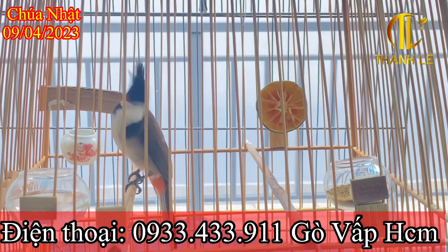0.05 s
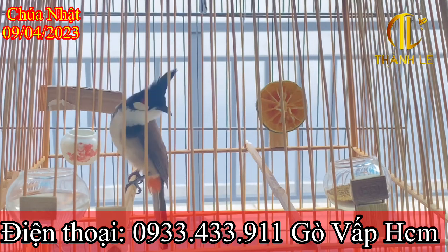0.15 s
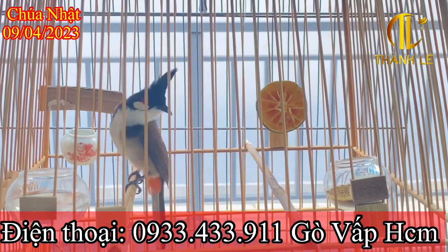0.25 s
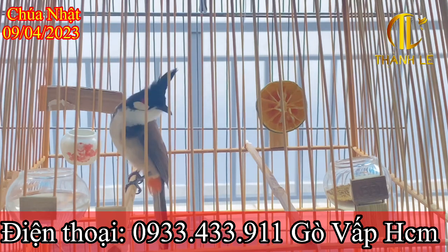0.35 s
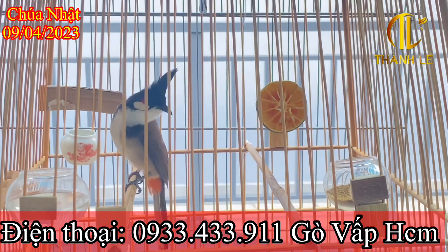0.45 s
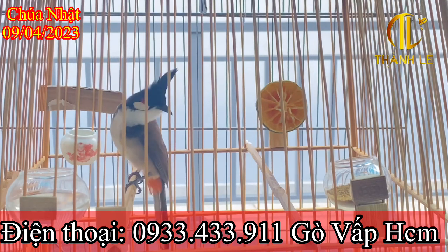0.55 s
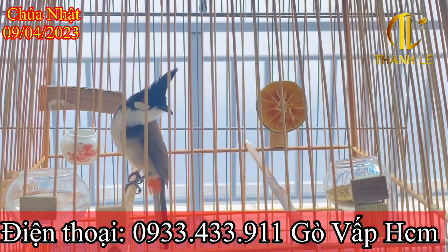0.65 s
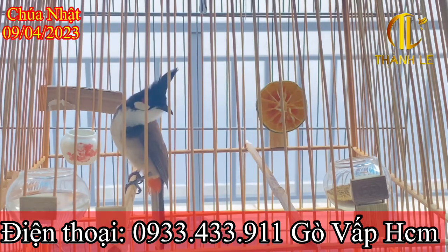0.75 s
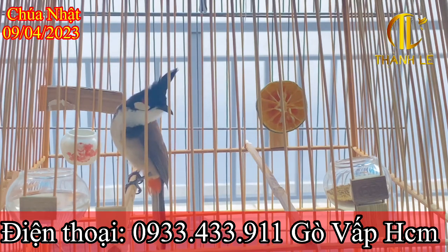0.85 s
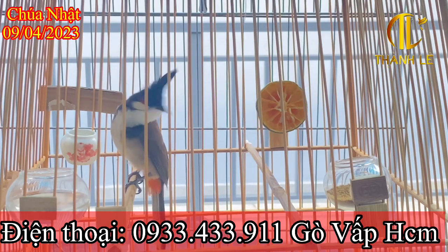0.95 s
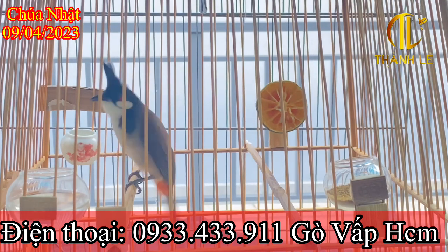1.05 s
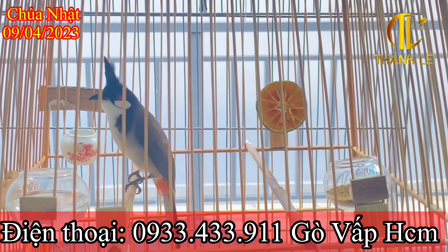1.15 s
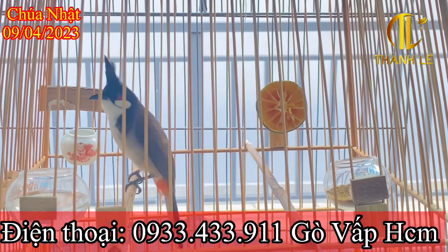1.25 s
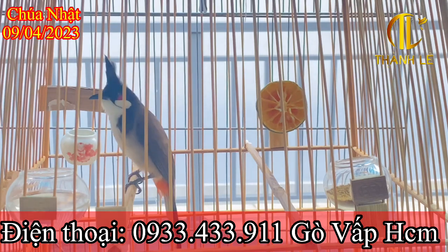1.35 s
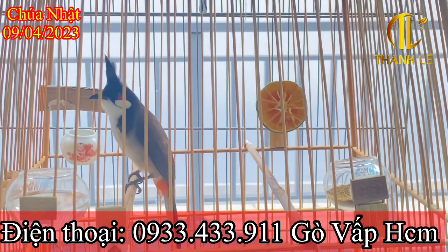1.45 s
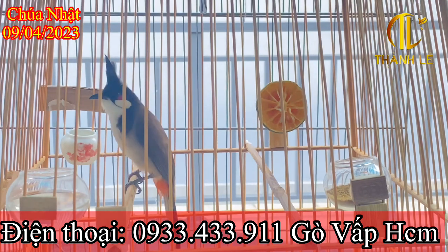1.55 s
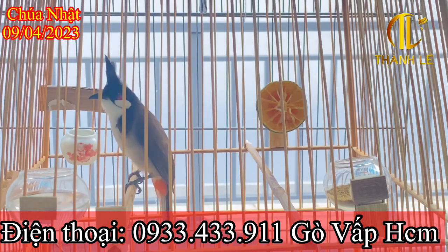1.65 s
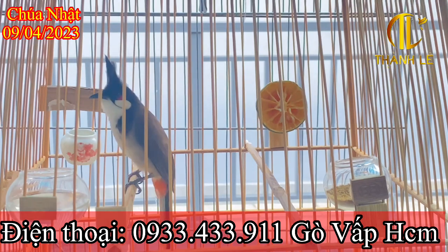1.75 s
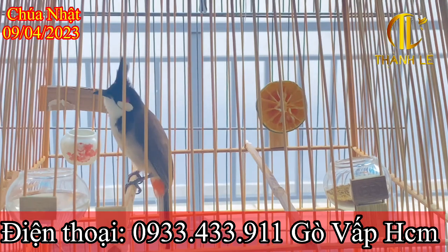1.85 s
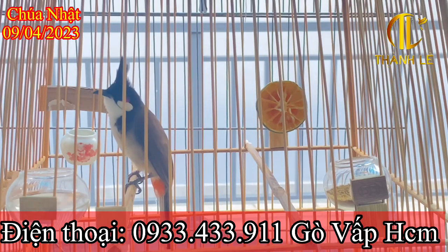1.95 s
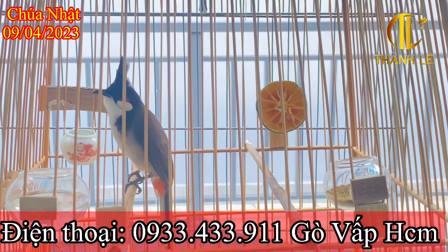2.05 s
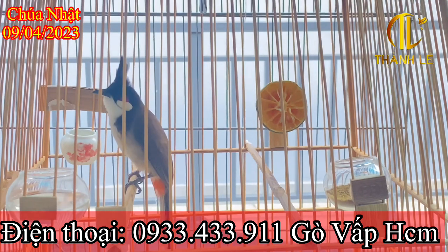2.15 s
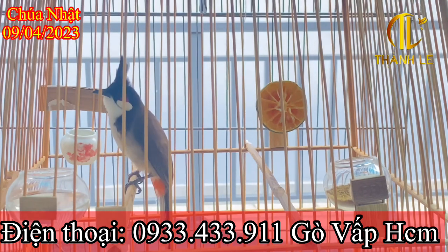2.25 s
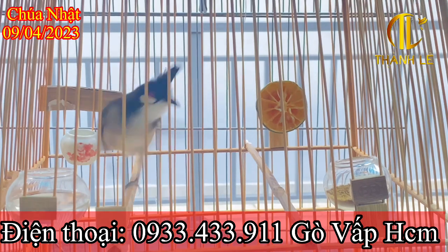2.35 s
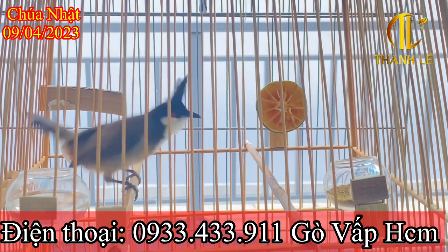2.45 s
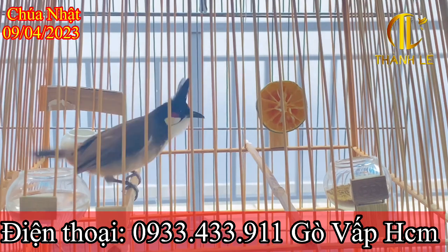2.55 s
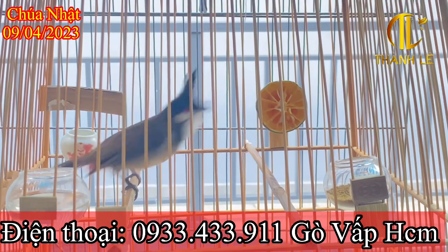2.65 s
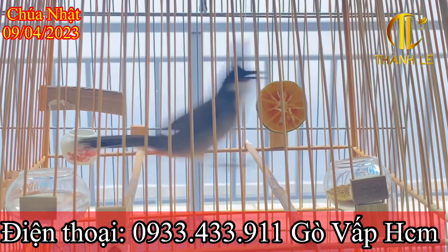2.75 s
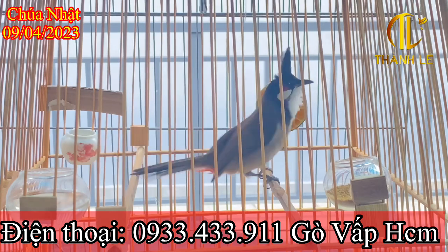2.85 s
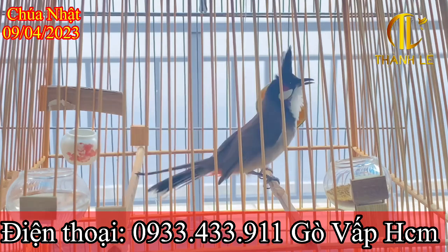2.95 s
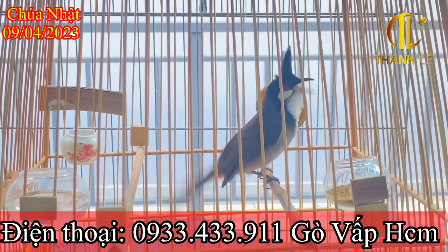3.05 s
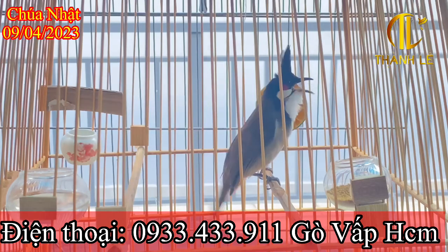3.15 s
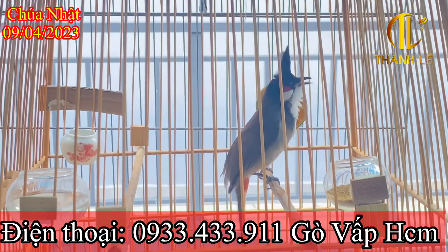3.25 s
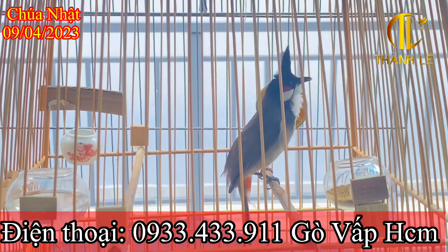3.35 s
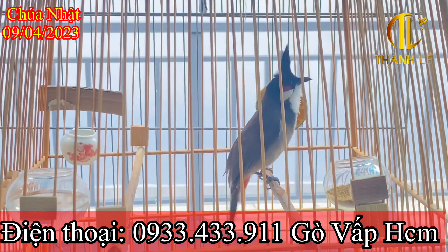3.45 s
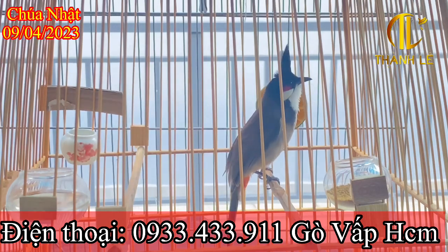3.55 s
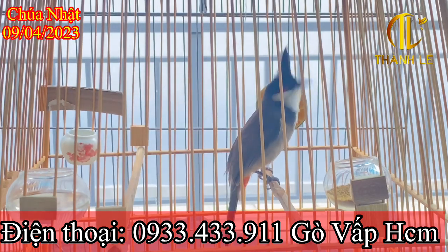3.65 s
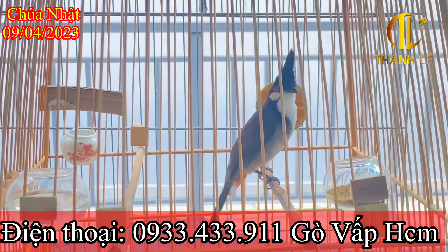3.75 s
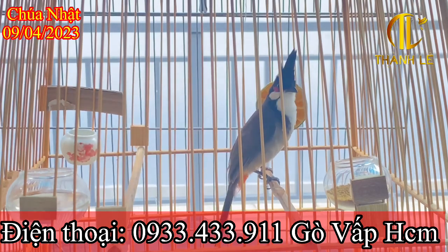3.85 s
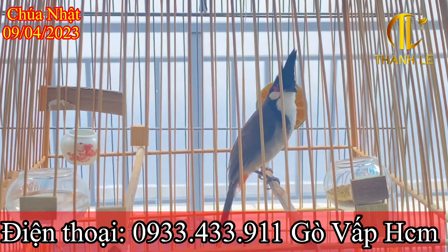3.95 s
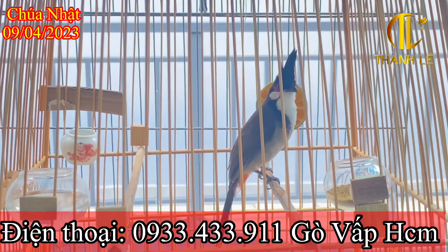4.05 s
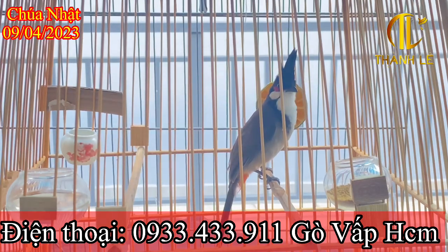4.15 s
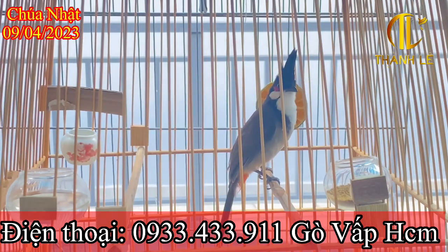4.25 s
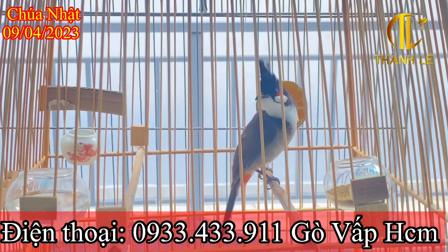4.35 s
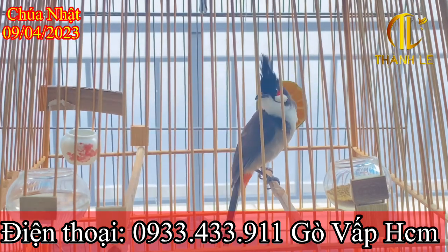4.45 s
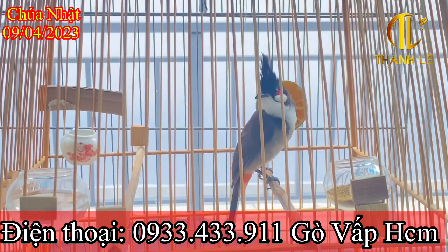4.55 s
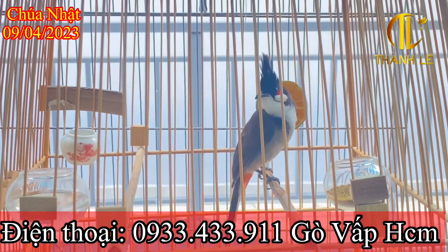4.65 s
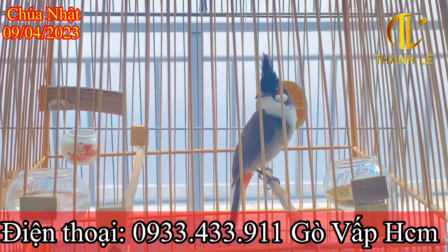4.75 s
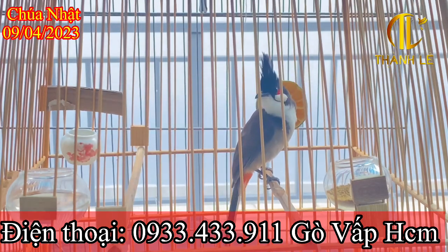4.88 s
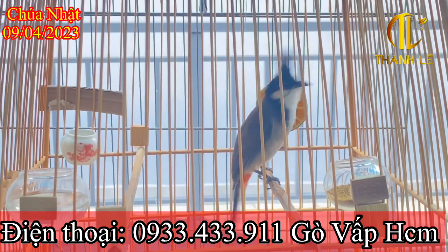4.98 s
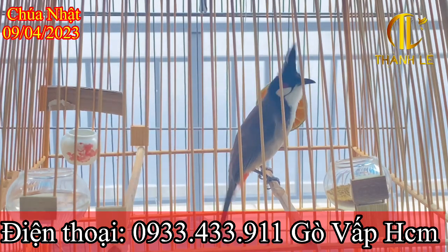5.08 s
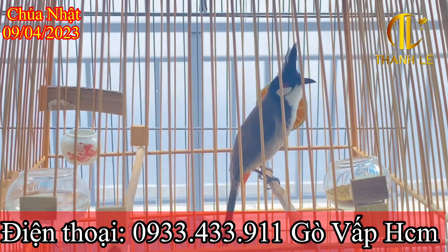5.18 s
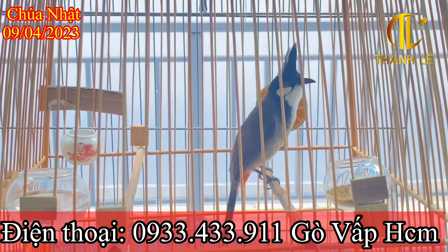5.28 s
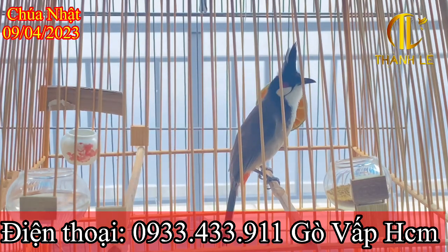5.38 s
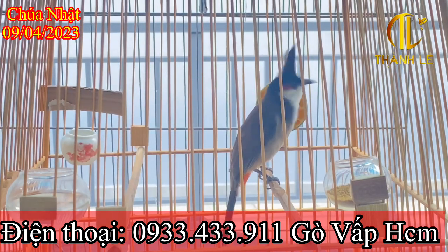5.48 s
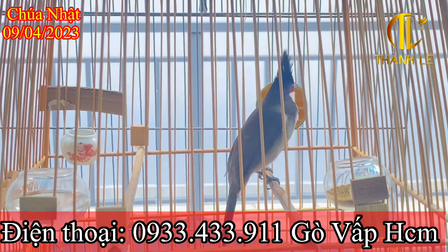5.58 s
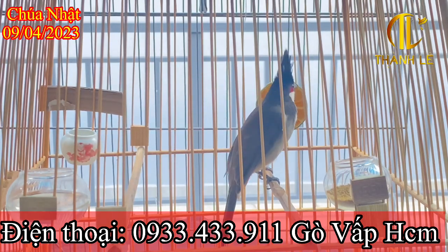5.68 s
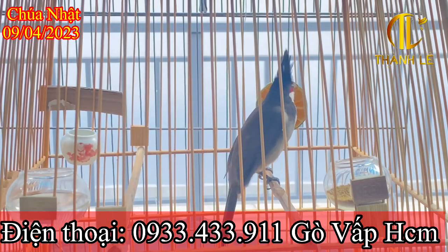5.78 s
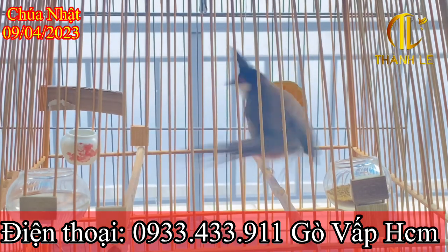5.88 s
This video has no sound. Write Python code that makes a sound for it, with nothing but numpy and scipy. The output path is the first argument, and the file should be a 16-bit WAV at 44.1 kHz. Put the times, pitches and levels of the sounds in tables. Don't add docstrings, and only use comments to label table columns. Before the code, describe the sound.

Short, loud, liquid bird phrases ring out near the microphone with hard echoes, over quiet air, perch knocks and a distant low hum.

```python
import sys
import numpy as np
from scipy import signal
from scipy.fft import rfft, irfft, next_fast_len
from scipy.io import wavfile
from scipy.ndimage import uniform_filter1d, map_coordinates

SR = 44100
rng = np.random.default_rng(int(sys.argv[2]) if len(sys.argv) > 2 else 0)


def store_wav(level_fs):
    pcm = np.round(np.clip(np.atleast_2d(level_fs), -1, 1) * 32767)
    wavfile.write(sys.argv[1], SR, pcm.T.astype(np.int16))


def nominal_scale(level):
    x = np.asarray(level, float) / 20
    return 10 ** x


N = 261072

# (peak level in dB, swing in Hz, time of one pitch dip in seconds, dips per second, rate change per second).
TRILLS = [
    ("rise", (0.4285, .064, 2250, 3430, 3400), (-16, 720, 0.466, 155, -1600)),
    ("arch", (.555, .115, 2600, 3200, 2520), (-21, 480, 0.605, 113, -1100)),
    ("swell", (2.755, .053, 2000, 2230, 2330), (-17.5, 270, 2.7865, 95, 1)),
    ("lead", (3.041, 0.035, 1750, 2350, 2350), (-18.5, 500, 3.065, 150, 1)),
    ("rise", (4.375, .069, 2400, 3260, 3180), (-16.5, 720, 4.4002, 190, -400)),
    ("arch", (4.505, 0.13, 2600, 3250, 2540), (-16, 560, 4.553, 107, -1100)),
    ("burst", (4.702, 0.0472, 2950, 3690, 3620), (-14, 870, 4.7238, 98, 100)),
    ("roll", (4.829, .097, 3050, 3250, 2750), (-16.5, 420, 4.8762, 105, -200)),
]
TRILL_SHAPES = { "rise": [(0, 0, 0, -17.5, 0.99), (.25, .45, 0.016, -9.5, 0.98),
                (.48, .9, 0.023, -2.5, .65), (.62, 0.98, 0, -1.5, .4), (.8, 1, .2, 0, .12),
                (.94, 0.99, .9, -1.5, .09), (1, 0.99, 0.98, -7.5, .07)], "swell": [(0, 0, 0, -11, .5),
                (.2, .1, 0, -9.5, .7), (.4, .85, 0, -4, 1), (.6, .9, 0, -3.5, .9), (.8, 1, 0, -0.5, .2),
                (1, 1, 0.97, -8, .1)], "roll": [(0, 0, 0, -10, 1), (.06, .2, 0, -3.5, .9),
                (.2, .6, 0.027, -.5, .9), (.4, 1, 0, -1, 0.98), (.75, 1, .7, -3, 1), (.9, 1, .95, -7, .9),
                (1, 0.87, 1, -16, .8)], "arch": [(0, 0, 0, -16, .9), (.06, .05, 0, -10.5, 1),
                (.2, .1, 0, -7.5, .9), (.3, .55, 0, -3.5, .85), (.45, 1, 0, -.5, .75),
                (.53, 1, .15, -.5, .75), (.64, 1, .65, -5, .75), (.9, 1, 0.94, -6, 0.75),
                (1, 0.98, 0.97, -20, .5)], "burst": [(0, 0, 0, -13, .9), (.15, .55, 0, -9, 0.93),
                (.35, .98, 0.031, -3, 1), (.55, 1, 0.44, 0, 0.91), (.8, 1, .9, -1.5, .85),
                (1, 0.95, 1, -20, .7)], "lead": [(0, 0.0045, 0, -14, .7), (.2, .35, 0, -4, .75),
                (.4, .35, 0, -5, .75), (.6, .75, 0, 0, .85), (.9, .9, 0, 0.5, 1), (1, 0.98, 0, -7, 1)], }
TRILL_STYLE = {"rise": (32, 30, .15, .8), "arch": (34, 16, .35, .93), "burst": (17, 30, .25, .8),
               "lead": (24, 40, .2, .8), "swell": (20, 30, .1, .8), "roll": (18, 30, .05, .8)}
# start in seconds,
# length in seconds, first and last pitch in Hz, level in dB.
WHISTLES = [(.546, 0.014, 2300, 1910, -29.5), (2.634, 0.0095, 1610, 1490, -38),
            (2.642, 0.015, 2400, 2060, -30.5), (2.714, 0.043, 1800, 1630, -30),
            (2.805, .02, 2230, 2240, -31), (2.921, 0.015, 1380, 1540, -29.5),
            (2.933, 0.031, 1928, 1975, -24), (2.960, .039, 1850, 1830, -19),
            (3.073, .011, 2954, 2850, -9.5), (3.0835, .0215, 2897, 3450, -12),
            (3.193, .031, 3060, 2845, -14.5), (3.251, 0.021, 2200, 2050, -25),
            (3.269, .028, 2403, 2350, -17), (3.293, 0.055, 2774, 2586, -16),
            (3.351, 0.03, 2071, 1911, -26.5), (3.376, .061, 2083, 1489, -20),
            (4.496, 0.0083, 2380, 1790, -29), (4.804, .026, 2200, 2440, -26)]
# time in seconds, pitch change in Hz,
# half width in seconds, level lift in dB.
BENDS = [(.558, 500, .003, 3), (.551, -100, .003, 2), (.628, 150, .004, 3), (.663, 100, .002, 3),
         (2.6515, 1, .002, 5), (2.741, 1, .012, 9.5), (2.756, 150, .003, -3), (2.7805, 1, .001, -5),
         (2.9345, -200, .0012, 4), (2.938, 250, .001, -5), (2.958, -50, .004, -4), (2.9655, -40, .002, 3),
         (2.9725, 1, .002, 2), (2.969, 1, .0015, -3), (2.9765, 1, .002, -4), (2.985, 1, .002, -3),
         (3.082, -250, .002, -3), (3.194, 700, .002, -6), (3.264, 1, .003, -4), (3.292, -150, .0015, -6),
         (2.7925, 1, .001, -5), (2.801, 1, .001, -6), (3.078, 300, .004, 3), (3.0896, 230, .003, 4),
         (3.092, 1, .0007, -14), (3.0969, -100, .0018, -7.5), (3.102, 120, .002, 0.5),
         (3.342, 1, .006, 2.5), (3.415, 1, .012, 1.5), (3.198, 150, .0012, 4), (3.196, 1, .001, -5),
         (3.200, -150, .001, -9), (3.259, 100, .002, 6), (3.274, 370, .003, -2), (3.277, 1, .001, -6),
         (3.320, 400, .003, 1.5), (3.353, 400, .002, 6), (3.379, 330, .004, 3.5), (3.387, -1, .003, -4),
         (3.397, 1.5, .004, 2.5), (4.5414, 50, .0015, 3), (4.580, 0.5, .0015, 2), (4.615, 1, .008, 2),
         (4.549, 50, .0018, 3), (4.559, 150, .002, 1.5), (4.576, 1, .002, -4), (4.7213, 1, .001, -10),
         (4.730, 1, .0007, -7), (4.7403, 1, .001, -9.5), (4.8095, -200, .0012, -17),
         (4.8152, 451, .0025, -2.5), (4.817, 0, .001, -5)]
# multiple, level in dB, extra dB per 100 Hz of trill swing.
OVERTONES = [(.5, -49.5, 2.0), (1.5, -45, 1.8), (2, -33.5, -0.15), (3, -35.5, .5), (4, -37.5, .3),
             (5, -42, -0.5), (6, -33.5, 0), (7, -48.5, 0)]
# frequency in Hz, gain in dB.
THROAT = [(1000, -5), (1550, 9), (2400, 3), (3300, 8.5), (3900, -2.5), (4400, 0), (5200, -1), (5900, 3),
          (7000, -1), (8200, -0.5), (10000, -7), (12000, 2)]
# time in seconds, gain in dB.
BEAK = [(.45, -6.5), (.6, -8), (2.64, 1), (2.73, 5.5), (2.93, 4), (2.96, 3), (3.04, -1.5), (3.08, .5),
        (3.3, -0.5), (3.35, 4), (3.38, 0), (4.4, -4.5), (4.72, -4.5), (4.83, -7)]
# time in seconds, gain in dB.
FACING = [(.45, -12), (.6, -7.5), (2.7, -6), (2.8, -5), (2.93, 4), (2.96, -1), (3.1, 2.5), (3.2, -2.5),
          (3.26, 4), (3.3, 1), (3.36, 4), (4.4, -7.5), (4.55, -3.5), (4.75, -5), (4.9, -11)]
# start, length and time to the pitch crest in seconds,
# peak level in dB, octave level in dB.
CHIPS = [
    (0.256, 0.042, 0.018, -48, -9.5),
    (.762, 0.0388, 0.021, -48, -10),
    (1.621, 0.047, .020, -42.5, -3.5),
    (1.763, 0.046, .025, -41, -0.5),
    (2.371, 0.048, .027, -43.5, -6),
    (4.572, 0.036, .018, -43, 6),
    (4.726, 0.037, 0.0266, -43.5, -5),
    (4.952, 0.066, .048, -39, -15),
    (5.584, 0.04, .017, -49, -6.5),
    (5.871, 0.043, 0.02, -46, -5),
]
# time in seconds, level in dB,
# centre in Hz, 60 dB decay in seconds.
TICKS = [(1.002, -56.5, 3160, 0.034), (2.713, -42, 2600, 0.036), (2.78, -54, 333, 0.15),
         (3.0, -56.5, 610, 0.64), (3.418, -51.5, 616, 1.4), (3.55, -53, 323, 0.78),
         (3.96, -51.5, 375, 0.45), (5.129, -52, 600, 0.087), (5.172, -49, 400, 0.25),
         (3.196, -49, 11500, .012), (5.505, -60, 565, 0.095)]
# start in seconds, length in seconds, first and last pitch in Hz, level in dB.
FAR_CALLS = [(1.085, .03, 4400, 5900, -72), (1.11, .05, 5000, 4750, -72), (1.345, .06, 3050, 3100, -73),
             (1.235, .04, 1800, 1950, -70), (.84, 0.076, 4200, 4200, -75), (1.471, 0.06, 1846, 1794, -53),
             (1.491, 0.043, 3020, 3710, -63.5), (1.559, 0.18, 3720, 3630, -67.5),
             (1.669, 0.13, 4300, 4200, -69), (1.845, 0.13, 3440, 3470, -69), (2.46, .16, 3450, 3400, -69),
             (3.709, 0.055, 5940, 4600, -67), (5.429, 0.009, 1600, 2305, -56),
             (5.444, 0.038, 1848, 1875, -51.5), (5.454, .04, 1500, 1550, -58),
             (1.472, 0.061, 1548, 1602, -61), (1.479, .03, 2900, 3050, -64),
             (5.453, 0.034, 2830, 3020, -58.5), (5.445, 0.029, 3700, 3700, -59.5)]
# start in seconds, hold in seconds, level in dB.
HISS_SWELLS = [(.002, .003, -77), (.1, .1, -91), (.22, .2, -82), (.78, .01, -83.5), (1.004, .01, -85),
               (1.08, .14, -76), (1.24, .005, -67.5), (1.26, .2, -73.5), (1.305, .006, -69), (1.385, .004, -73),
               (1.466, .008, -65.5), (1.49, .08, -76), (1.63, .04, -71.5), (1.76, .05, -71), (1.84, .11, -84),
               (1.95, .16, -90), (2.14, .16, -74.5), (2.22, .015, -66), (2.37, .25, -75.5), (2.62, .07, -81),
               (2.7, .32, -77), (3.02, .09, -70.5), (3.11, .08, -84), (3.2, .3, -72), (3.5, .17, -74.5),
               (3.674, .008, -66), (3.74, .39, -76), (4.16, .82, -83), (4.98, .02, -75), (5.13, .22, -72),
               (5.352, .004, -64), (5.4, .22, -75), (5.78, .04, -79.5), (5.83, .06, -70.5)]
# frequency in Hz, level in dB per Hz.
AIR = [(3000, -10), (5000, 3.5), (7300, 5), (9300, 2), (11000, -0.5), (15500, 1.5)]
# start in seconds, length in seconds, first and last pitch in Hz, level in dB.
DRONES = [
    (3.501, .14, 119.8, 136.6, -42.5),
    (3.937, 0.11, 122.5, 138, -39.5),
    (4.521, .15, 288.6, 285, -53.5),
    (5.785, 0.13, 281.5, 303, -55.5),
]
# centre in Hz, width in Hz, level in dB.
HUM_BAND = (126, 23, -63)
# frequency in Hz, level in dB per Hz.
TOWN = [(15, -48.5), (25, -27.5), (37, -15.5), (59, -3.5), (71, -9.5), (81, -12), (126, -9), (165, -11.5),
        (201, -13.5), (366, -19.5), (812, -26), (1580, -33.5), (5000, -47.5), (6500, -67.5), (11000, -120)]
# delay in milliseconds, level in dB.
ECHOES = [(4.5, -17.5), (9, -16), (13.5, -21.5), (18.5, -16.5), (26, -23.5), (33, -26.5), (47, -26)]
# frequency in Hz, correlation.
LIKENESS = [(60, .93), (200, 0.92), (380, 0.652), (700, 0.02), (1290, 0.033), (2380, 1), (4400, 1),
            (8100, .5), (15000, 0.15)]
# frequency in Hz, left minus right in dB.
LEAN = [(60, -3.5), (250, 0), (500, -1.8), (2000, -0.5)]
# frequency in Hz, gain in dB.
MIC = [(25, -11), (45, 0.0), (8000, 0.0), (9300, -3), (10300, 3.5), (11500, 6.5), (12500, -2), (13000, -32),
       (13800, -32), (14300, 3.5), (15700, -1.5), (16100, -55.5)]
# frequency in Hz, radians the left leads.
LEAD = [(1300, 0.14), (1700, .04), (2200, 0.21), (2500, 0.14), (3200, 0.69), (4500, 0.52), (8000, .8),
        (11000, 1.2), (14000, 1.7)]


def singer():
    tone, effort = np.zeros(N), np.zeros(N)
    shake, air = drift(350), drift(2600)
    for t, hz, level_db, swing, (dip_s, rate, glide), (dip_db, lopsided, slowest) in [*trills(), *whistles()]:
        start = t[0]
        bright_db = np.interp(start, *np.transpose(BEAK))
        facing_db = np.interp(start, *np.transpose(FACING))

        cycle = turns(np.clip(rate + glide * (t - dip_s), slowest * rate, 1.3 * rate))
        cycle = cycle - np.interp(dip_s, t, cycle)
        dip = np.cos((cycle - lopsided * (1 - np.cos(cycle))) / 2) ** 2

        unsteady = (15 + .11 * swing) * during(shake, start, t)
        pitch = hz + swing * (.3 - 1.3 * dip ** 1.5) + unsteady
        pitch = np.minimum(pitch, 3700 + .35 * (pitch - 3700))
        phase = turns(pitch)

        edge = np.clip(np.minimum(t - start, t[-1] - t) / .0025, 0, 1)
        held = edge * nominal_scale(level_db)
        split_db = .9 * swing / 500 * (level_db - level_db.max()) * (1 - dip) ** 5.0
        loud = held * nominal_scale(-dip_db * dip ** 4.5 + split_db)

        rasp = during(air, start, t)
        breathy = nominal_scale(-32 + bright_db + swing / 70) * rasp * held
        overtones = 0
        for k, db, per_swing_db in OVERTONES:
            treble_db = facing_db * np.clip(k * pitch / 3000 - 2.7, 0, 1)
            over_db = db + bright_db + per_swing_db * swing / 100 + at_hz(THROAT, k * pitch) + treble_db
            overtones = overtones + nominal_scale(over_db) * np.sin(k * phase)
        rough = 1 + (0.085 + swing / 800) * rasp
        add(tone, start, (loud + breathy) * np.sin(phase) + held * overtones * rough)
        add(effort, start, held * nominal_scale(bright_db))
    return tone * nominal_scale(0.66 * drift(260)), effort


def trills():
    for kind, (start, length, first_hz, top_hz, last_hz), (peak_db, swing_hz, *clock) in TRILLS:
        t = np.arange(start, start + length, 1 / SR)
        share, *shape = np.transpose(TRILL_SHAPES[kind])
        climb, fall, level_db, swing = [np.interp((t - start) / length, share, c) for c in shape]
        swing = np.maximum(swing, 0)
        hz = first_hz + (top_hz - first_hz) * climb + (last_hz - top_hz) * fall
        dip_db, fade_db, lopsided, slowest = TRILL_STYLE[kind]
        dip_db = dip_db * swing ** 1.7 * np.clip(1 + level_db / fade_db, 0, 1)
        yield t, *bent(t, hz, peak_db + level_db), swing_hz * swing, clock, (dip_db, lopsided, slowest)


def whistles():
    attack_s, release_s, edge_db = .004, .004, -15
    for start, length, first_hz, last_hz, db in WHISTLES:
        t = np.arange(start, start + length, 1 / SR)
        hz = first_hz + (last_hz - first_hz) * ((t - start) / length) ** .6
        inside = np.minimum((t - start) / attack_s, (t[-1] - t) / release_s)
        level_db = db + 20.5 * np.log2(hz / first_hz) + edge_db * np.clip(1 - inside, 0, 1)
        yield t, *bent(t, hz, level_db), 0 * t, (start, 0, 0), (0, 0, 0)


def bent(t, hz, level_db):
    for s, bend_hz, width, lift_db in BENDS:
        bump = np.exp(-((t - s) / width) ** 2)
        hz, level_db = hz + bend_hz * bump, level_db + lift_db * bump
    return hz, level_db


def singer_breath(effort, hiss):
    facing_db = np.interp(np.arange(N) / SR, *np.transpose(FACING))
    breath = nominal_scale(-45.5) * coloured([(2500, -40), (3500, 1.0), (7500, -3), (9500, -29.5)])
    central = hiss[0] * [[1], [1]] + nominal_scale(-13.5) * hiss
    return effort * (breath + nominal_scale(1.4 * facing_db - 40) * central)


def ticks():
    out, t = np.zeros(N), np.arange(SR // 3) / SR
    puffs = rng.standard_normal((len(TICKS), len(t)))
    for (start, db, hz, t60), puff in zip(TICKS, puffs):
        spread = 1.146 + .25 * np.exp(-t60 / .4)
        band = signal.butter(2, [hz / spread, hz * spread], "band", fs=SR, output="sos")
        dying = puff * nominal_scale(-60 * t / t60) * np.sqrt(SR / hz)
        add(out, start, nominal_scale(db) * signal.sosfilt(band, dying))
    return out


def neighbour():
    out, shake = np.zeros(N), drift(150)
    for start, length, crest, peak_db, octave_db in CHIPS:
        t = np.arange(0, length, 1 / SR)
        uneven = during(shake, start, t)
        wobble = 2 * np.pi * 46 * (t - crest)
        wobble_hz = 180 * np.tanh(.3 + 1.8 * np.cos(wobble - .3 * np.cos(wobble))) - 45
        crest_hz = 80 * np.exp(-((t - crest) / .013) ** 2)
        base_hz = 1441 + 14 * (peak_db + 41)
        phase = turns(base_hz + crest_hz + wobble_hz + 20 * uneven)
        octave = np.sin(2 * phase) + nominal_scale(-18) * np.sin(3 * phase)
        voice = np.sin(phase) + nominal_scale(octave_db + 3.0 * uneven) * octave
        add(out, start, nominal_scale(peak_db) * np.sin(np.pi * t / length) ** 0.685 * voice)
    return out


def far_birds():
    out, shake = np.zeros(N), drift(120)
    for start, length, first_hz, last_hz, db in FAR_CALLS:
        t = np.arange(0, length, 1 / SR)
        warble_hz = 8.98 / max(length, .04) * during(shake, start, t)
        phase = turns(first_hz + (last_hz - first_hz) * t / length + warble_hz)
        voice = np.sin(phase) + nominal_scale(-18) * np.sin(2 * phase)
        add(out, start, nominal_scale(db) * np.sin(np.pi * t / length) ** 0.2 * voice)
    return out * nominal_scale(2.7 * drift(90)) * (0.86 + 0.8 * drift(500))


def hiss_level():
    rise_db_per_s, fall_db_per_s, still_db = 700, 280, -101.
    t, level_db = np.arange(N) / SR, np.full(N, still_db)
    for start, hold, db in HISS_SWELLS:
        slope = np.maximum(rise_db_per_s * (start - t), fall_db_per_s * (t - start - hold))
        level_db = np.maximum(level_db, db - np.maximum(slope, 0))
    return level_db


def drones():
    out = np.zeros(N)
    for start, length, first_hz, last_hz, db in DRONES:
        t = np.arange(0, length, 1 / SR)
        phase = turns(first_hz + (last_hz - first_hz) * t / length)
        upper_db = -15 - 12.5 * np.log2(first_hz / 120)
        voice = np.sin(phase) + nominal_scale(upper_db) * (np.sin(3 * phase / 2) + np.sin(3 * phase))
        add(out, start, nominal_scale(db) * np.sin(np.pi * t / length) ** 0.2 * voice)
    return out * nominal_scale([[-1.7], [1.7]])


def hum():
    hz, width, db = HUM_BAND
    band = coloured([(hz - 3 * width / 2, -60), (hz - width / 2, -3), (hz, 0),
                     (hz + width / 2, -3), (hz + 3 * width / 2, -60)])
    tone = np.sin(turns(56.3 + 1.5 * drift(7.3))) * nominal_scale(-50.5 + 1.8 * drift(4.5))
    return nominal_scale(db) * band + tone * nominal_scale([[-1.4], [1.4]])


def town_floor(hiss_db, tone):
    swell_db = 0.064 * uniform_filter1d(hiss_db + 77.5, size=6000)
    duck_db = 25 * uniform_filter1d(np.abs(tone), size=5000)
    rumble = nominal_scale(-50.5 + swell_db - duck_db) * coloured(TOWN + [(9000, -89.5)])
    return rumble + nominal_scale(-1.5 * duck_db) * hum()


def slaps(x):
    out = np.zeros(N)
    for ms, db in ECHOES:
        add(out, ms / 1000, nominal_scale(db) * x)
    return out


def room(x, t60, side_db):
    t = np.arange(SR) / SR
    tail = rng.standard_normal((2, SR)) * nominal_scale(-60 * t / t60) * np.minimum(t / 0.031, 1)
    tail = tail / np.sqrt(np.sum(tail[0] ** 2))
    mid, side = signal.fftconvolve(x[None], tail, axes=1)[:, :N]
    return mid + nominal_scale(side_db) * side * [[1], [-1]]


def coloured(spectrum):
    hz = np.maximum(np.arange(N // 2 + 1) * SR / N, 5.)
    mid, side = rfft(rng.standard_normal((2, N)))
    alike, sign = np.clip(at_hz(LIKENESS, hz), -1, 1), np.array([[1], [-1]])
    pair = np.sqrt(1 + alike) * mid + np.sqrt(1 - alike) * side * sign
    return rms_one(irfft(pair * nominal_scale(at_hz(spectrum, hz) + sign * at_hz(LEAN, hz) / 2), N))


def drift(rate):
    knots = rng.standard_normal(int(N / SR * rate) + 2)
    return rms_one(map_coordinates(knots, [np.arange(N) * rate / SR], order=3))


def during(curve, start_s, t):
    return curve[round(start_s * SR):][:len(t)]


def turns(hz):
    return 2 * np.pi * np.cumsum(hz) / SR


def at_hz(points, hz):
    point_hz, value = np.transpose(points)
    return np.interp(np.log(hz), np.log(point_hz), value)


def rms_one(x):
    return x / np.sqrt(np.mean(x ** 2) + 1e-20)


def add(track, start_s, sound):
    i = round(start_s * SR)
    track[i:i + len(sound)] += sound[:N - i]


def scene():
    tone, effort = singer()
    near = tone + neighbour() + ticks()
    far = far_birds()
    echoes = slaps(near) + nominal_scale(-19.5) * room(near, 0.62, side_db=-13) + nominal_scale(-5.5) * room(far, 0.3095, side_db=-26)

    hiss_db = hiss_level()
    hiss = coloured([(1500, -53.5)] + AIR)
    swelling_hiss = hiss * nominal_scale(hiss_db + 4.0 + 1.2 * drift(21))
    steady = nominal_scale(-81.5) * coloured([(2500, -30.5), (4000, -0.5), (7000, -7.5), (9000, -30.5)])
    air = singer_breath(effort, hiss) + steady + swelling_hiss
    return near + far + echoes + air + town_floor(hiss_db, tone) + drones()


def low_pass(x):
    return signal.sosfilt(signal.butter(12, 16960, fs=SR, output="sos"), x)


def record(dry):
    size = next_fast_len(N + 4096)
    hz = np.maximum(np.arange(size // 2 + 1) * SR / size, 5.)
    ports = nominal_scale(at_hz(MIC, hz)) * np.exp(.5j * at_hz(LEAD, hz) * [[1], [-1]])
    mix = irfft(rfft(dry, size) * ports, size)[:, :N]
    return low_pass(mix)


dry = scene()
out = record(dry)
store_wav(out)
```